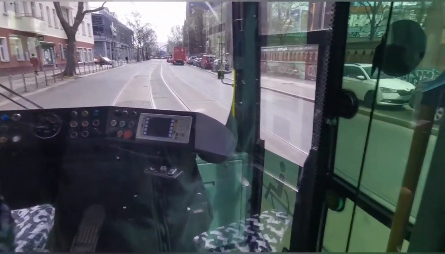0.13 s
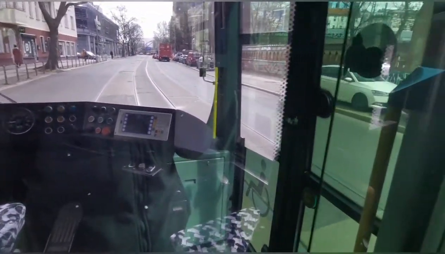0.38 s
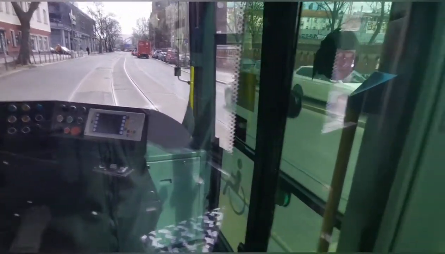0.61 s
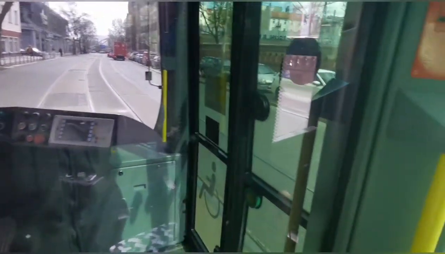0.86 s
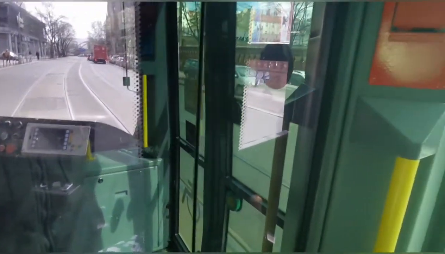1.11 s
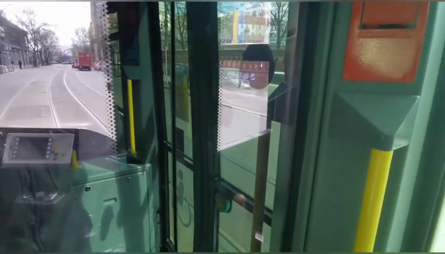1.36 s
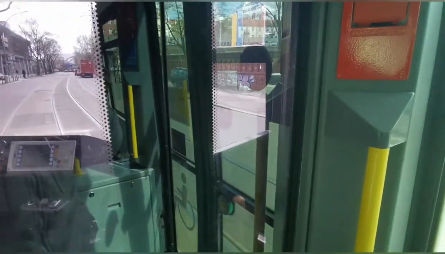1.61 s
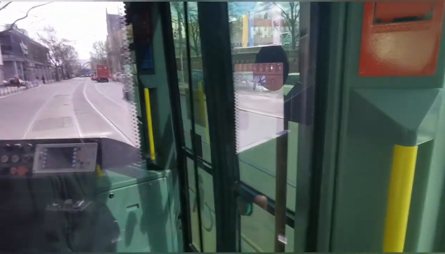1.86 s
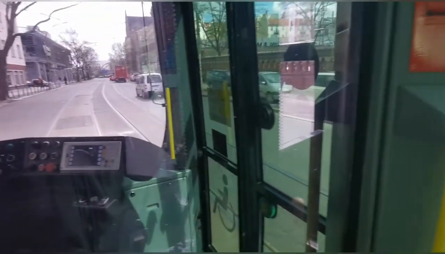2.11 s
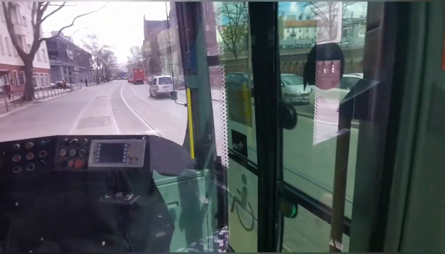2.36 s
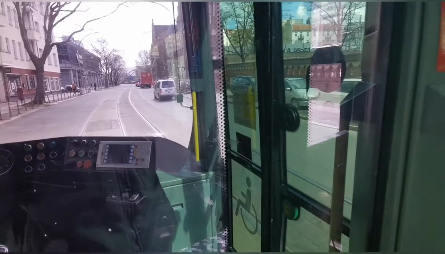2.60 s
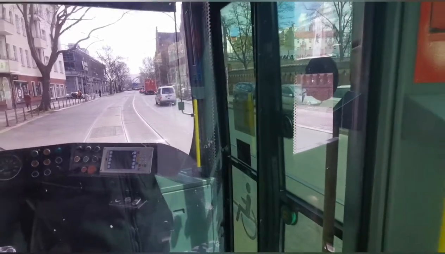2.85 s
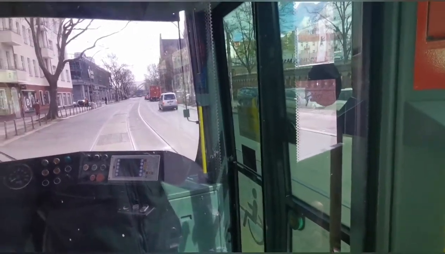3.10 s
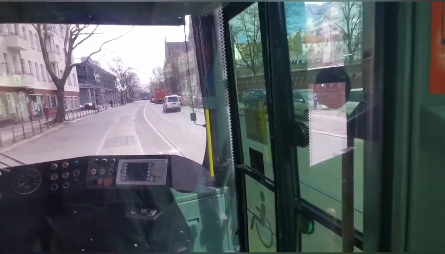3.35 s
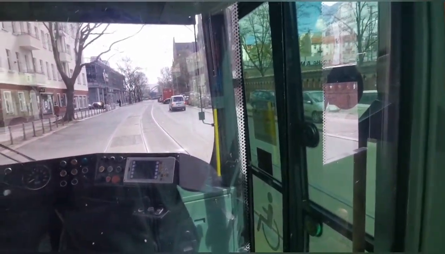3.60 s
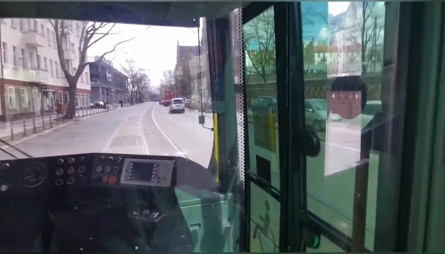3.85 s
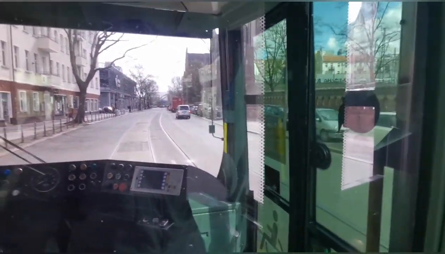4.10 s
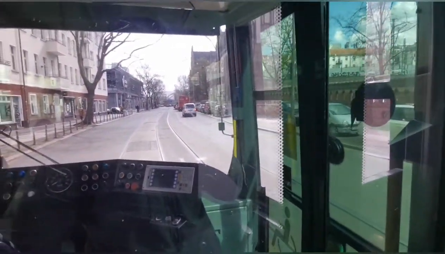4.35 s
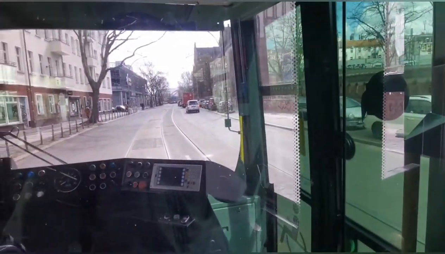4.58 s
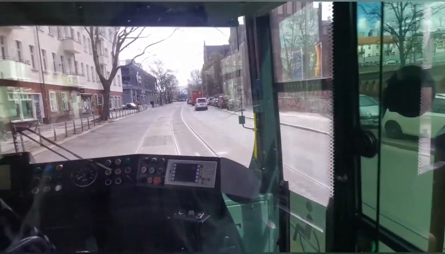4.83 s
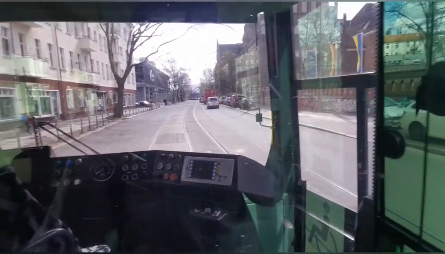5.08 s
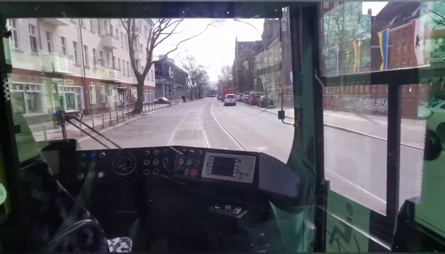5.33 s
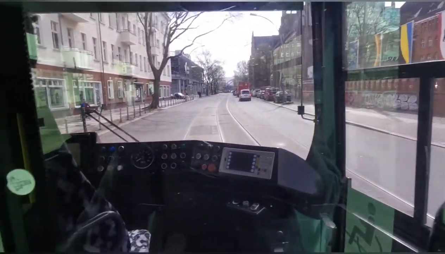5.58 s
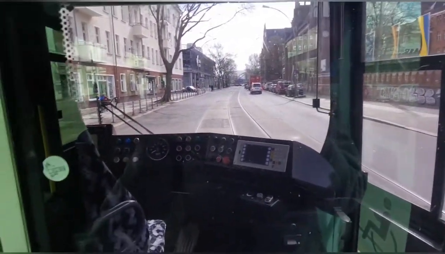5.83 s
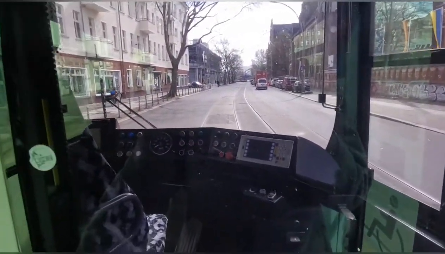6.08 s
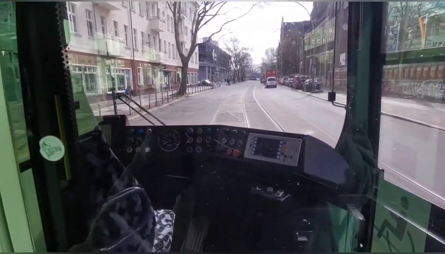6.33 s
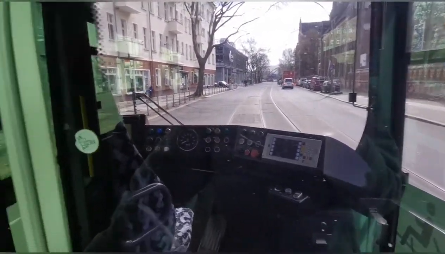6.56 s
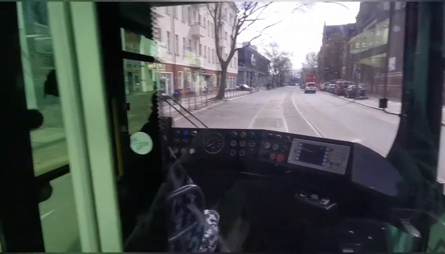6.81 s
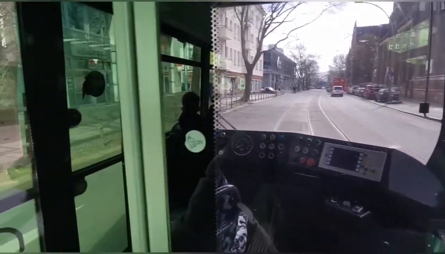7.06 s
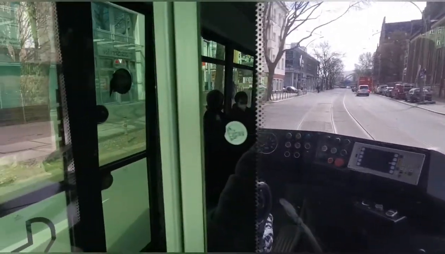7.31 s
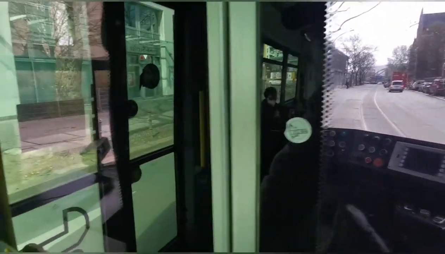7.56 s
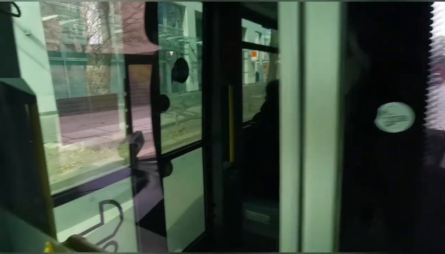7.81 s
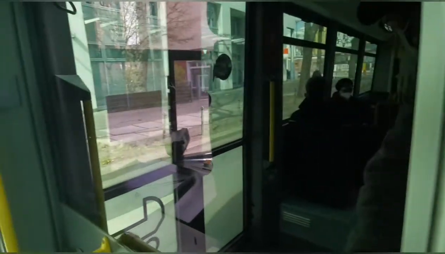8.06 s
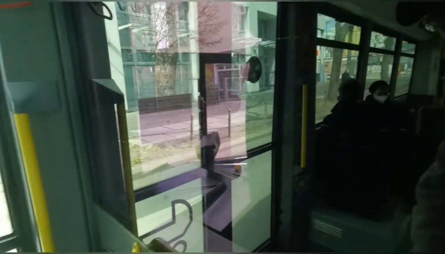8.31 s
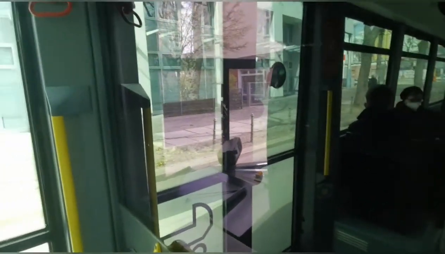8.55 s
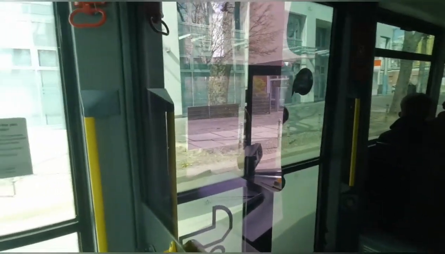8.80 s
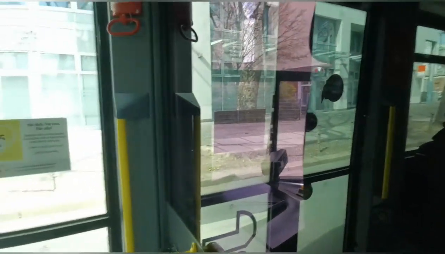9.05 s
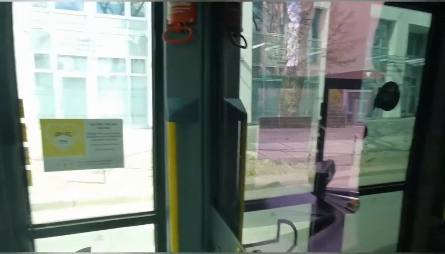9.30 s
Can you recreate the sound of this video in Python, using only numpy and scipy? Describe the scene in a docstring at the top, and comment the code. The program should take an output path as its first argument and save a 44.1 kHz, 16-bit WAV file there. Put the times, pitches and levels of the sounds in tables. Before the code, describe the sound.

Inside a braking tram, deep gear tones sink through heavy floor rumble and stop; a thud follows, then steady beating fan hum with clacks and rustles.

```python
"""Inside a tram braking to a stop. At first two gear tones sink through floor resonances over rumble and wheel roar,
with faint converter tones above, until both cease near 1.7 s; two beating fans hum throughout.
Clacks and scrapes are decaying noise bursts, dull knocks low decaying tones with some noise.
From 2.3 s a thin sine whistle dips periodically, and a low shaft drone comes forward after 3.4 s.
Cloth rustles now and then, small metal parts clink after 7.5 s.
Two microphone ports on a hand-held phone colour the treble differently."""
import sys
import numpy as np
from scipy import signal
from scipy.fft import rfft, irfft, next_fast_len
from scipy.io import wavfile
from scipy.ndimage import uniform_filter1d

SR = 44100
rng = np.random.default_rng(int(sys.argv[2]) if len(sys.argv) > 2 else 0)


def ratio_of_db(decibels):
    """Turn decibels (scalar or array-like) into linear amplitude factors; 0 dB maps to 1."""
    return 10 ** (np.asarray(decibels, float) / 20)


def persist_wave(psi):
    """Save psi, clipped to +-1, as 16-bit WAV."""
    counts = np.round(np.clip(psi, -1, 1) * 32767).astype(np.int16)
    wavfile.write(sys.argv[1], SR, np.atleast_2d(counts).T)


N = 415422
T = np.arange(N) / SR
LEAD_S, FLOOR_LEAD_S = 0.00019, 0.00038  # lead of the left port, for airborne and for floor-borne sound

# Source levels are those before the panels and ports act.
# auxiliary motors, faint tones: pitch_hz, level_db
MOTOR_TONES = [(490, -72), (875, -80.5)]
# shaft drone: time_s, level_db
DRONE_LEVEL = [(3.4, -62), (3.5, -40), (4.24, -44), (4.44, -39), (4.65, -55), (5, -45), (6.1, -45),
               (6.4, -40.5), (6.65, -54), (7, -37.5), (7.15, -50), (8.2, -39), (8.7, -47.5), (9.03, -43),
               (9.2, -62), (9.42, -60)]
# shaking of the carriage relative to its nominal level: time_s, level_db
SHAKE_LEVEL = [(0, 13), (.3, 13.5), (1.2, 13.5), (1.7, 8.5), (2.2, 11), (2.55, 5), (2.85, 3), (2.96, 6),
               (3.5, 4), (3.8, -0.5), (4.5, -2), (4.85, -1.5), (5.2, -0.5), (7.2, -0.8), (7.42, 3.5),
               (7.55, 0), (8.2, 2.2), (8.6, -2.5), (9.42, -1.5)]
# rocking of the carriage on its springs: peak_s, length_s, level_db
SPRING_ROCKS = [(.15, .1, -30), (.28, .2, -29), (1.57, .3, -24), (1.91, 0.09, -25.5), (2.17, .25, -24),
                (2.96, 0.27, -35), (7.42, .1, -39), (7.69, 0.18, -41), (8.18, 0.34, -41.5),
                (8.55, 0.21, -39.5), (9, .2, -43.5)]
# slowly varying air hiss: time_s, level_db
AIR_LEVEL = [(0, -66), (1.5, -67), (2.8, -64.5), (3.5, -70), (4.7, -70.5), (5.2, -75.5), (6, -71.5),
             (6.5, -66), (8.4, -63.5), (8.6, -68), (9.42, -65)]
# cloth moving near the phone: peak_s, length_s, hiss_db, fine_rustle_db
CLOTH_MOVES = [(.1, 0.17, -76, -73), (1.2, .3, -66, -76), (1.8, .4, -63.5, -70), (2.54, 0.16, -66, -74),
               (3.88, 0.23, -68.5, -80.5), (6.85, 0.38, -62.5, -62.5), (7.15, .3, -78, -65.5),
               (8.18, 0.28, -58, -59), (9.13, 0.21, -58.5, -62), (9.4, .3, -59.5, -62)]
# relative spectra of sway, rumble, body noise, hiss and fine rustle: frequency_hz, density_db (per Hz)
SWAY_COLOUR = [(10, -9.5), (20, 2), (32, -0.5), (48, -12)]
RUMBLE_COLOUR = [(25, -16.5), (40, 2), (60, -2), (110, -6), (170, -15.5), (260, -48.5)]
BODY_COLOUR = [(110, -14.5), (170, 10), (225, 18), (280, 2.5), (380, -3.5), (600, -6.5), (800, -11),
               (1100, -18.5), (1600, -23.5), (2500, -32)]
HISS_COLOUR = [(700, -3.5), (1300, 2.5), (1800, 2), (2200, 2), (2700, 1.5), (4600, -4), (5500, -10),
               (7000, -12.5), (11000, -20.5)]
RUSTLE_COLOUR = [(3000, -12), (6000, -7.5), (10000, -1.5), (16500, -8.5)]
# supply whistle: time_s, level_db
WHISTLE_LEVEL = [(2.3, -82), (2.75, -77), (3.3, -84), (3.7, -68), (3.9, -81), (4.8, -79), (5.6, -73.5),
                 (6.3, -81), (6.6, -85), (6.95, -85), (7.5, -92), (8.3, -84), (8.8, -83), (9.05, -74),
                 (9.42, -86)]
# latches and panels: start_s, level_db, centre_hz, width_octaves, treble_db, left_minus_right_db
LATCH_CLACKS = [(1.091, -53, 3470, .96, -59.5, -4), (1.589, -39.5, 2395, 0.88, -50.5, -2.5),
                (2.132, -57, 1980, 1.1, -62, -2.5), (2.872, -47, 1210, 0.79, -41.5, 3),
                (2.873, -53, 3540, 0.45, -47, 2.5), (3.424, -70, 3000, .76, -72.5, -3),
                (7.104, -46, 2100, 0.86, -70.5, -2.5), (7.23, -59, 1200, 1.7, -64.5, -9),
                (7.922, -52, 1500, 1.1, -66, -3.5), (8.341, -57.5, 2100, 0.3, -61, -9),
                (8.72, -70, 4000, 1, -68.5, 7.5), (8.86, -65.5, 2500, 2, -75, 6.5),
                (9.172, -60, 2100, 0.47, -57.5, 2.5)]
# parts scraping past each other: start_s, length_s, level_db, centre_hz, treble_db, left_minus_right_db
PART_SCRAPES = [(0.573, .03, -65, 4010, -73, 2), (2.157, .047, -42.5, 2480, -50.5, 0),
                (2.638, 0.039, -62.5, 4400, -70, 0), (3.882, 0.036, -60.5, 1680, -62.5, -0.5),
                (4.569, 0.12, -69, 1570, -79, .1), (6.731, .25, -68, 3000, -64.5, 8.5),
                (7.376, 0.049, -60.5, 1300, -73, -12.5), (7.387, 0.086, -66, 6800, -64, -18),
                (8.058, .08, -55, 5740, -62.5, 3.5), (9.031, 0.12, -60, 4200, -64.5, 5)]
# fittings that ring in one narrow band: start_s, length_s, level_db, centre_hz, width_octaves
FITTING_RINGS = [(2.775, .01, -61.5, 3800, .2), (3.891, 0.024, -59.5, 4800, 0.27),
                 (2.159, 0.041, -55, 4700, 0.2), (2.892, .1, -57, 1400, .5), (1.59, 0.015, -60, 3880, 0.23),
                 (4.955, 0.039, -67, 1370, 0.25), (5.727, .02, -67, 3100, 0.23),
                 (6.103, .04, -69, 1641, 0.21), (7.13, 0.9, -68.5, 2100, 0.19),
                 (7.399, 0.18, -66, 2100, .15), (8.015, 0.1, -57, 4950, 0.25),
                 (9.012, .056, -67, 5900, .04), (9.129, .06, -60, 3370, 0.037),
                 (9.25, 0.097, -66, 5900, .04)]
# small metal parts touching: start_s, ring_hz, level_db, t60_s
METAL_CLINKS = [(7.551, 10660, -58, .2), (7.551, 6650, -58, 0.37), (7.64, 4850, -62.5, .25),
                (7.631, 8750, -61.5, 0.27), (7.925, 4560, -57.5, 0.69), (7.926, 12400, -63.5, 0.26),
                (8.09, 15000, -46, 0.21), (8.094, 10800, -53.5, 0.18), (8.102, 10900, -53, 0.25),
                (9.252, 11450, -61.5, 0.48), (9.35, 7700, -59, .3), (9.351, 10460, -58.5, 0.2),
                (9.402, 11050, -59, .2)]
# dull knocks through the floor: start_s, level_db, centre_hz, width_octaves, t60_s, left_minus_right_db
FLOOR_KNOCKS = [(2.108, -10.5, 116, 0.58, 0.18, 1.5), (2.142, -23.5, 132, 1.1, 0.23, 2),
                (2.962, -26.5, 49.86, 0.74, 0.19, 3), (3.005, -23, 49.7, 1.15, 0.15, 0.5),
                (3.333, -26.5, 103, 0.38, 0.5, -0.5), (5.201, -41, 74, 0.4, 1, 1),
                (7.378, -32.5, 395, 1.08, 0.45, -14.5), (7.455, -44, 700, 1.34, 0.51, -12),
                (8.2, -38, 328, 0.98, 0.7, -13)]
# modes of the floor: frequency_hz, level_db
FLOOR_RESONANCES = [(24, 2.5), (48, -6.5), (72, 10.5), (101, -3), (150, 7.5), (186, 10.5), (265, 2),
                    (325, -3), (420, -6.5)]
# wall and glass resonances: centre_hz, width_hz, gain_db
PANEL_RESONANCES = [(315, 89, 3), (488.5, 67, 6), (613, 35, 3), (915, 50, 2.5), (1400, 54, 0.5),
                    (1880, 60, 2), (2220, 76, 0), (2750, 20, 0.5), (3470, 150, 1), (4600, 90, 2)]
# converter tones while braking: pitch_hz, level_db
CONVERTER_TONES = [(4587, -85), (5270, -87.5), (5329, -88), (5954, -85), (6158, -85.5), (6600, -83.5),
                   (6850, -84.5), (9200, -90.5), (9889, -90.5), (10664, -91), (12312, -88)]
# resonances excited by the upper mesh, the lower mesh and the lower mesh's octave: centre_hz, width_hz, level_db
UPPER_MESH_RESONANCES = [(192.4, 21, -29.5), (175.2, 10, -18.5), (167.7, 9, -22.5), (150.9, 12.6, -22),
                         (130, 23, -36), (101, 12, -25), (80, 8, -22), (69, 6.5, -24.5)]
LOWER_MESH_RESONANCES = [(83.2, 5, -22.5), (76.6, 4.7, -28.5), (67.53, 6.3, -16), (61.2, 5.3, -16),
                         (51.2, 10.4, -17), (45.3, 2.5, -24.5), (37.2, 10, -20.5), (29, 4, -22)]
OCTAVE_RESONANCES = [(118, 12, -34), (98.6, 5.3, -29.5), (85, 9.8, -32.5)]
# response of the two ports: frequency_hz, left_db, right_db
PORT_RESPONSE = [(20, 1.5, 1.5), (595, -3.5, -4.5), (1000, -1, -3), (1500, -2, -3), (2100, -2, -0.5),
                 (3080, -3, -10), (5000, -2, -17.5), (5970, -2.5, -15), (6700, -4.5, -2.5), (7750, -7, -18),
                 (9160, -4, -25), (9400, -1, -26), (12400, -4, -27.5), (15000, -10.5, -29.5)]
# electronic hiss of the microphones: frequency_hz, density_db (per Hz)
MICROPHONE_HISS = [(400, -125), (1500, -117), (5000, -119), (9800, -129), (10800, -125), (16500, -126)]


def curve(table):
    """Linear interpolation turns a two-column time table into one value per sample."""
    s, value = np.transpose(table)
    return np.interp(T, s, value)


def shape(table, hz, column=1, ends=-90):
    rows = np.array(table, float)
    db = np.interp(np.log(hz + 1), np.log(rows[:, 0]), rows[:, column], left=ends, right=ends)
    return ratio_of_db(db)


def bell(hz, centre_hz, octaves, db):
    """A Gaussian resonance on the octave scale, normalised to total power db."""
    g = np.exp(-(np.log2((hz + 1) / centre_hz) / octaves) ** 2)
    return ratio_of_db(db) * g / np.sqrt(np.mean(g ** 2))


def sides(pan_db):
    """Level difference between two channels, split equally about the centre."""
    return ratio_of_db(np.array([[pan_db], [-pan_db]]) / 2)


def diffuse(size, lead_s=LEAD_S):
    """Spatial coherence: long waves reach both ports, the left first; short waves are unrelated."""
    alike_hz = 590
    hz = np.fft.rfftfreq(size, 1 / SR)
    common, left, right = rfft(rng.standard_normal((3, size)))
    share = np.exp(-(hz / alike_hz) ** 2 / 2)
    turn = np.exp(1j * np.pi * hz * lead_s)
    shared = np.sqrt(share) * common
    own = np.sqrt(1 - share)
    return hz, np.array([shared * turn + own * left, shared / turn + own * right])


def noise(table, lo_hz, hi_hz, lead_s=LEAD_S):
    """Coloured noise normalised to unit power between two frequencies."""
    size = next_fast_len(N)
    hz, spectra = diffuse(size, lead_s)
    gain = shape(table, hz)
    inside = (hz > lo_hz) & (hz < hi_hz)
    gain = gain / np.sqrt(np.sum(gain[inside] ** 2) / len(hz))
    return irfft(spectra * gain, size)[:, :N]


def walk(rate):
    """Random fluctuation: values held 1 / rate s, smoothed twice, with a spread near 1."""
    k = int(SR / rate)
    held = np.repeat(rng.standard_normal(N // k + 1), k)
    return 1.276 * uniform_filter1d(uniform_filter1d(held, k), k)[:N]


def tone(hz, db, lead_s=LEAD_S):
    """A sine of given rms level, whose arrival difference appears as a phase difference."""
    phase = 2 * np.pi * np.cumsum(hz) / SR + 2 * np.pi * rng.random()
    lead = np.pi * hz * lead_s
    return np.sqrt(2) * ratio_of_db(db) * np.sin([phase + lead, phase - lead])


def swells(table, column):
    """Gaussian power bumps (peak_s, length_s, level_db), summed as incoherent sources."""
    return sum(ratio_of_db(2 * row[column]) * np.exp(-(2 * (T - row[0]) / row[1]) ** 2) for row in table)


def add(out, s, gain, t60, rise, hold=0.):
    """Impact noise coloured by gain(hz): fast rise, short hold and exponential decay."""
    size = 2 ** 15
    hz, spectra = diffuse(size)
    t = np.arange(size) / SR
    decay = np.exp(-np.log(1000) * np.maximum(t - hold, 0) / max(t60, .02))
    envelope = (1 - np.exp(-t / rise)) * decay
    envelope *= 1 + 0.27 * np.exp(-t / 0.0055)  # the first contact is hardest
    chatter = uniform_filter1d(np.repeat(rng.standard_normal(size // 128), 128), size=64)
    envelope *= ratio_of_db(1.8 * (1 - np.exp(-t / 0.013)) * chatter)  # loose parts chatter
    i = int(s * SR)
    out[:, i:i + size] += (irfft(spectra * gain(hz), size) * envelope)[:, :N - i]


def through(x, gain):
    """Linear filtering by the response gain(hz); mirrored ends prevent clicks."""
    pad = 8192
    size = next_fast_len(N + 2 * pad)
    wide = np.pad(x, ((0, 0), (pad, size - N - pad)), mode="reflect", reflect_type="odd")
    return irfft(rfft(wide) * gain(np.fft.rfftfreq(size, 1 / SR)), size)[:, pad:pad + N]


def patchy(x, depth_db):
    """Many small rubs modulate narrow bands independently, the bass least."""
    hz, _, cells = signal.stft(x, SR, nperseg=1024)
    field = rng.standard_normal(cells.shape[1:])
    field = uniform_filter1d(uniform_filter1d(field, size=5, axis=0), size=9, axis=1)
    depth = depth_db * np.clip(hz / 1200, .3, 1)[:, None]
    return signal.istft(cells * ratio_of_db(depth * field / field.std()), nperseg=1024)[1][:, :N]


def panels(x):
    """Wall resonances lift narrow bands, each with a Lorentzian gain in dB."""
    def gain(hz):
        return ratio_of_db(sum(db / (1 + (2 * (hz - centre_hz) / width) ** 2)
                       for centre_hz, width, db in PANEL_RESONANCES))
    return through(x, gain)


def mesh_db(hz, resonances, order=2):
    """Forced resonance: level of a tone crossing a row of modes; higher order gives flatter tops, steeper sides."""
    power = sum(ratio_of_db(2 * db) / (1 + (2 * (hz - centre_hz) / width) ** order) ** 2
                for centre_hz, width, db in resonances)
    return 10 * np.log10(power)


def fans():
    """Two fans slightly apart in speed beat by interference; motor tones and a shaft drone accompany them."""
    hum_hz, hum_db, drone_hz = 208.6, -40, 46.3
    second_fan_db, beat_hz, beat_peak_s = -9, 0.9914, 0.25
    beat = np.abs(1 + ratio_of_db(second_fan_db) * np.exp(2j * np.pi * beat_hz * (T - beat_peak_s)))
    db = hum_db + 2.1 * walk(11)
    hz = hum_hz + 1.189 * walk(25)
    blades = tone(hz, db + 0.42 * walk(20), FLOOR_LEAD_S)
    octave = tone(2 * hz, db - 28.5 + 3 * walk(8))
    motors = sum(tone(pitch_hz + 3 * walk(12), level_db + 3 * walk(5)) for pitch_hz, level_db in MOTOR_TONES)
    drone = tone(np.full(N, drone_hz), curve(DRONE_LEVEL), FLOOR_LEAD_S)
    return beat * (blades + octave) + motors + drone


def carriage():
    """Structural vibration as low noise bands that follow the shaking, with air hiss and grainy cloth rustle."""
    rumble_db, sway_db, body_db = -42, -53, -54  # at zero shake
    sway_share, body_share = 1.2, 0.35  # dB for each dB of shaking
    fine_db = -8  # fine treble of the air hiss relative to its body
    shake, air_db, flutter = curve(SHAKE_LEVEL), curve(AIR_LEVEL), walk(14)

    sway = np.sqrt(swells(SPRING_ROCKS, column=2) + ratio_of_db(2 * (sway_db + sway_share * shake)))
    out = noise(SWAY_COLOUR, 8.2, 53, FLOOR_LEAD_S) * sway
    out += noise(RUMBLE_COLOUR, 40, 140, FLOOR_LEAD_S) * ratio_of_db(rumble_db + shake + 2.3 * walk(8))
    out += noise(BODY_COLOUR, 262.4, 1200) * ratio_of_db(body_db + body_share * shake + 1.0 * walk(10))

    hiss = np.sqrt(ratio_of_db(2 * air_db) + swells(CLOTH_MOVES, column=2))
    fine = np.sqrt(ratio_of_db(2 * (air_db + fine_db)) + swells(CLOTH_MOVES, column=3))
    out += noise(HISS_COLOUR, 1500, 6000) * hiss * ratio_of_db(0.72 * flutter + 0.81 * walk(90))
    return out + noise(RUSTLE_COLOUR, 9000, 15000) * fine * ratio_of_db(1.5 * flutter + 1.3 * walk(150))


def wheels():
    """Rolling contact of steel on rail: a mid-band noise roar that fades away, with small level fluctuations."""
    centre_hz, start_db, fade_db_per_s = 1270, -55, 15
    size = next_fast_len(N)
    hz, spectra = diffuse(size)
    roar = irfft(spectra * bell(hz, centre_hz, .7, start_db), size)[:, :N]
    return roar * ratio_of_db(-fade_db_per_s * T + 1.5 * walk(25))


def whistle():
    """Supply loading: pitch and level sag as the blinker draws current; a weak partner sits just above."""
    start_s, start_hz, drift_hz_per_s = 2.3, 8430, 31
    blink_first_s, blink_every_s, blink_on_s = 2.37, .69, .21
    sag_hz, lag_s = 215, .035
    on = (T - blink_first_s) % blink_every_s < blink_on_s
    keep = np.exp(-1 / (lag_s * SR))
    sag = signal.lfilter([1 - keep], [1, -keep], 1. * on)  # exponential approach and return
    hz = start_hz - drift_hz_per_s * (T - start_s) - sag_hz * sag + 5 * walk(28)
    db = curve(WHISTLE_LEVEL) + 3 * walk(12) - 3 * sag
    return (tone(hz, db) + tone(hz + 58, db - 10.5)) * (T > start_s)


def knocks():
    """Impact and friction: clacks and scrapes decay treble first; rings and clinks excite narrow bands."""
    clack_hold_s, clack_t60_s = 0.018, .27
    scrape_octaves, scrape_t60_s = 1, .28
    treble_t60_share, rise_s = 0.58, .0006
    out = np.zeros((2, N))
    rows = [(*clack, clack_hold_s, clack_t60_s) for clack in LATCH_CLACKS]
    rows += [(s, db, hz, scrape_octaves, treble_db, pan_db, length_s, scrape_t60_s)
             for s, length_s, db, hz, treble_db, pan_db in PART_SCRAPES]
    for s, db, hz, octaves, treble_db, pan_db, hold, t60 in rows:
        add(out, s, lambda f: sides(pan_db) * bell(f, hz, octaves, db), t60, rise_s, hold)
        add(out, s, lambda f: sides(pan_db) * bell(f, 10000, .7, treble_db), t60 * treble_t60_share, rise_s, hold)
    for s, length_s, db, hz, octaves in FITTING_RINGS:
        add(out, s, lambda f: bell(f, hz, octaves, db), clack_t60_s, rise_s, length_s)
    for s, hz, db, t60 in METAL_CLINKS:
        # a narrow ring within a broader contact noise
        add(out, s, lambda f: bell(f, hz, 0.022, db) + bell(f, hz, 0.43, db + 1.5), t60, .001, .01)
    return out


def thuds():
    """Modal excitation: a soft push rings floor modes near its centre and shakes loose a little noise."""
    out = np.zeros((2, N))
    for s, db, hz, octaves, t60, pan_db in FLOOR_KNOCKS:
        add(out, s, lambda f: sides(pan_db) * bell(f, hz, octaves, db - 8.5), t60, .006, .02)
        i = int(s * SR)
        t = np.maximum(T[i:i + SR // 2] - s, 0)
        ring = 0
        for f, mode_db in FLOOR_RESONANCES:
            nearness = np.exp(-(np.log2(f / hz) / octaves) ** 2)
            ring = ring + ratio_of_db(mode_db) * nearness * np.sin(2 * np.pi * f * t)
        envelope = (1 - np.exp(-t / 0.0092)) * np.exp(-np.log(1000) * t / t60)
        out[:, i:i + len(t)] += sides(pan_db) * ratio_of_db(db - 5.0) * ring * envelope
    return out


def drive():
    """Gear meshing: two tones fall in fixed ratio, the lower with an octave; wavering converter tones sing above."""
    start_hz, braking_hz_per_s, low_ratio = 202, 82, .43
    gears_quiet_s, converter_off_s, fade_s = 1.72, 1.74, .05  # each fade ends at its quiet time
    running = np.clip((converter_off_s - T) / fade_s, 0, 1)
    converter = sum(tone(hz + 3 * walk(40), db + 2.3 * walk(12.0)) for hz, db in CONVERTER_TONES)

    hz = np.maximum(start_hz - braking_hz_per_s * T, 20)
    low_hz = low_ratio * hz
    mesh = tone(hz + 0.47 * walk(15), mesh_db(hz, UPPER_MESH_RESONANCES, order=4))
    mesh += tone(low_hz + 0.53 * walk(31), mesh_db(low_hz, LOWER_MESH_RESONANCES, order=6), FLOOR_LEAD_S)
    mesh += tone(2 * low_hz, mesh_db(2 * low_hz, OCTAVE_RESONANCES) + 2.9 * walk(11))
    return converter * running + mesh * np.clip((gears_quiet_s - T) / fade_s, 0, 1)


def scene():
    """Superposition of all sources; panel resonances colour the noise and the knocks."""
    rolling = patchy(wheels() + carriage(), depth_db=2.0)
    enclosed = panels(rolling + knocks())
    return fans() + enclosed + whistle() + thuds() + drive()


def low_pass(x):
    """Removes everything above the highest recorded frequency."""
    return signal.sosfilt(signal.butter(12, 15680, fs=SR, output="sos"), x)


def record(dry):
    """Transduction: each port filters the sound, then the electronics add independent hiss."""
    def port_gain(hz):
        return np.array([shape(PORT_RESPONSE, hz, column, ends=None) for column in (1, 2)])

    def hiss_gain(hz):
        return shape(MICROPHONE_HISS, hz) * np.sqrt(SR / 2)  # density per Hz to sample amplitude

    ported = through(dry, port_gain)
    hiss = through(rng.standard_normal((2, N)), hiss_gain)
    return low_pass(ported + hiss)


dry = scene()
out = record(dry)
persist_wave(out)
```